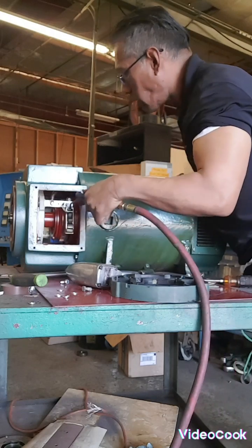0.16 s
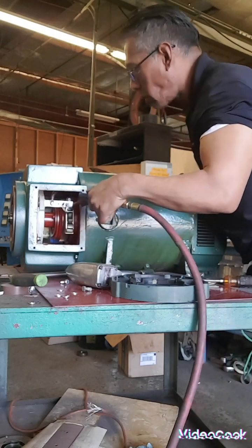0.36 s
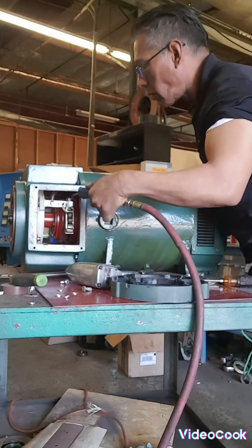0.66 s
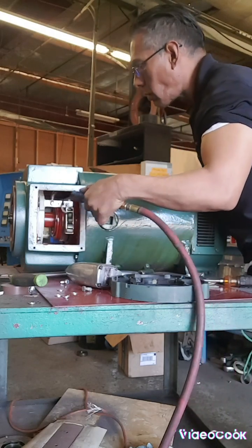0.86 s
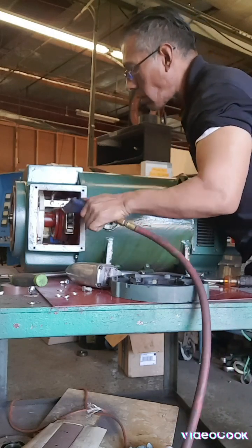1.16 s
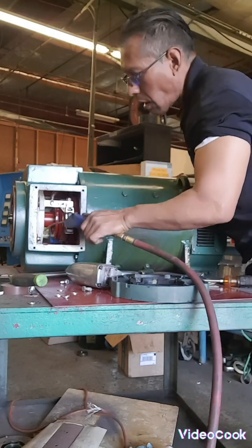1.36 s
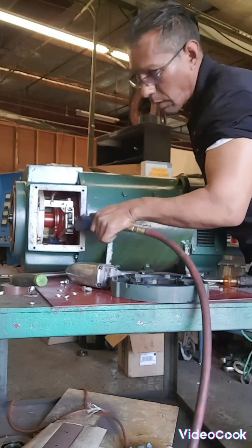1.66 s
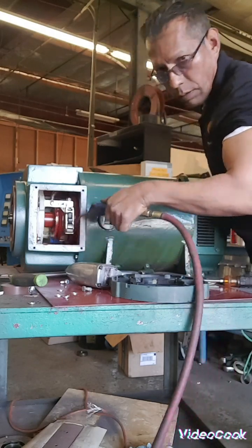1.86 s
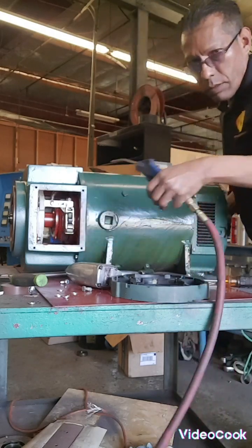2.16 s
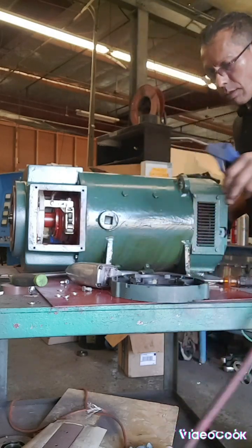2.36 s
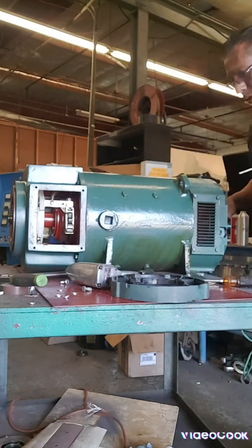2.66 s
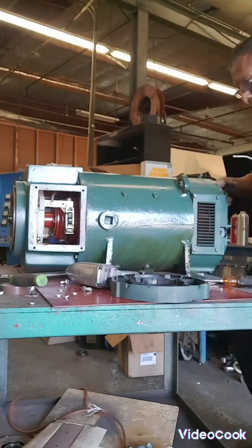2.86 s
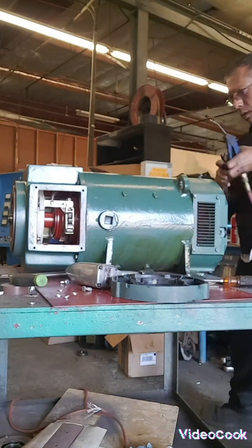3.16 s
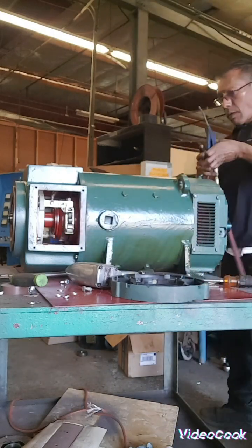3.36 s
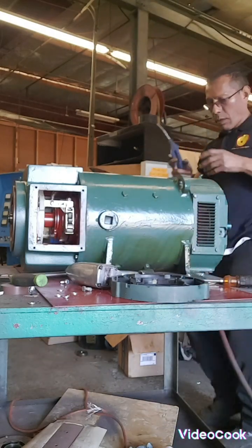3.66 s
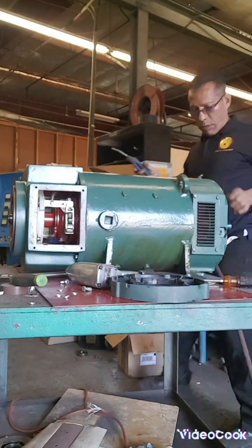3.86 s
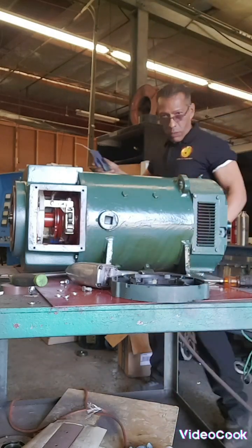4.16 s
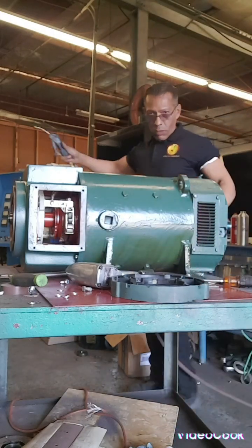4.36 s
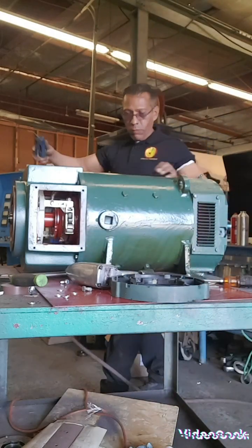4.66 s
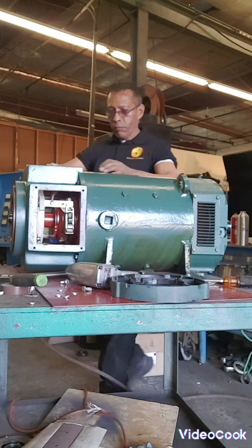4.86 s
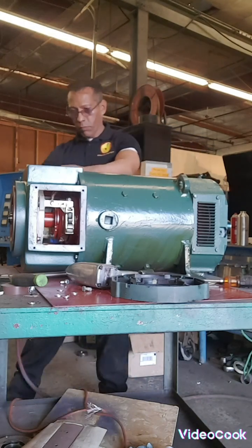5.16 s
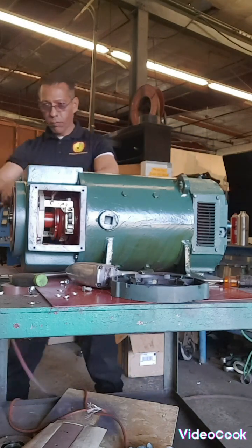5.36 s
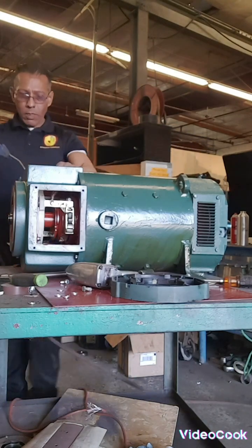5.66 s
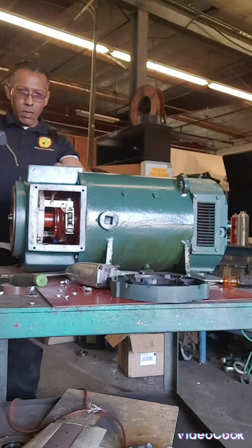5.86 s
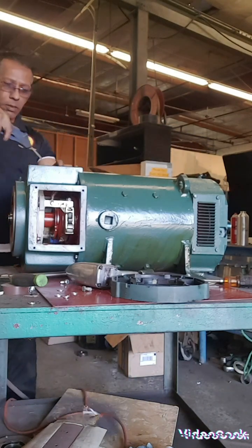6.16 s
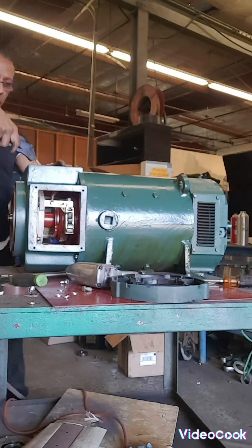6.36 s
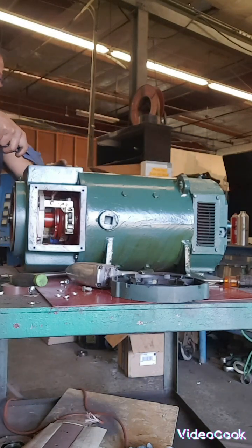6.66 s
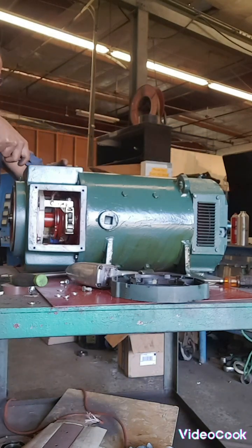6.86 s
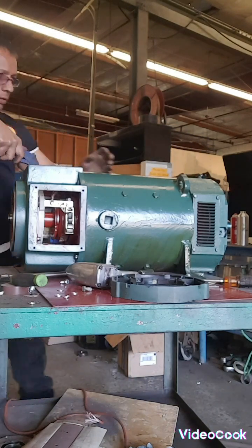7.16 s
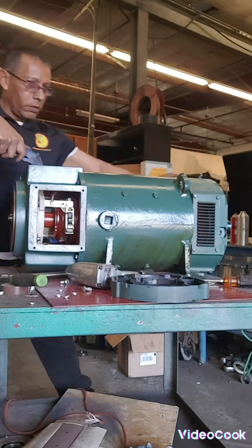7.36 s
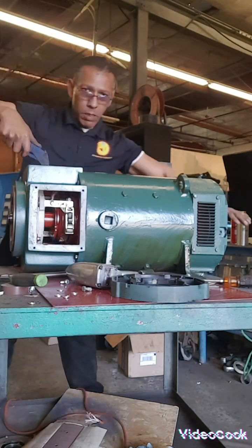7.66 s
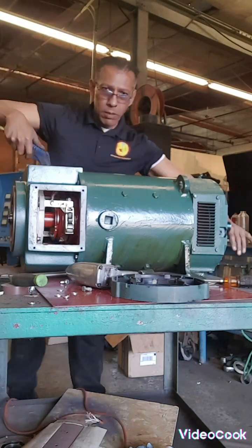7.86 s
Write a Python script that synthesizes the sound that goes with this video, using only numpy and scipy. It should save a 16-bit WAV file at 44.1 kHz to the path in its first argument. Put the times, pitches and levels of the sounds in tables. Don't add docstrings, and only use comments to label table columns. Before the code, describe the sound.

Close compressed-air hiss sweeps and flutters, buffeting the microphone; it stops, shoes scuff, a compressor bursts into chugging, and the jet resumes.

```python
import sys
import numpy as np
from scipy import signal
from scipy.fft import rfft, irfft, next_fast_len
from scipy.io import wavfile
from scipy.ndimage import uniform_filter1d, map_coordinates

SR = 44100
rng = np.random.default_rng(int(sys.argv[2]) if len(sys.argv) > 2 else 0)


def boost(x):
    u = np.asarray(x, float) / 20
    return 10 ** u


def store_wav(level_fs):
    pcm = np.round(np.clip(np.atleast_2d(level_fs), -1, 1) * 32767)
    wavfile.write(sys.argv[1], SR, pcm.T.astype(np.int16))


N = 352800
T = np.arange(N) / SR


def unit(x):
    return x / np.sqrt(np.mean(x ** 2) + 1e-20)


def along(points, hz):
    f, v = np.transpose(points)
    return np.interp(np.log(hz + 1), np.log(f + 1), v)


def levels(*tables):
    each = []
    for table in tables:
        s, *columns = np.transpose(table)
        each.append([np.interp(T, s, c, -120, -120) for c in columns])
    return np.max(each, axis=0)


def wobble(rate):
    knots = rng.standard_normal(int(N * rate / SR) + 4)
    return map_coordinates(knots, [T * rate])


def filtered(x, response):
    m = next_fast_len(N + 8192)
    return irfft(rfft(x, m) * response(np.fft.rfftfreq(m, 1 / SR)), m)[..., :N]


def colour(points, peaks=()):
    def gain(f):
        lift_db = sum(db / (1 + (2 * (f - c) / w) ** 2) for c, w, db in peaks)
        return boost(along(points, f) + lift_db)
    return gain


def rush(gain, alike, patchy_db, lead=0., streak_db=0.):
    z = signal.stft(rng.standard_normal((2, N)), nperseg=512)[2]

    def smooth(bins, frames):
        field = uniform_filter1d(rng.standard_normal(z.shape[1:]), bins, axis=0)
        return unit(uniform_filter1d(field, frames, axis=1))

    def turn(hz):
        return np.arccos(np.clip(along(alike, hz), -1, 1)) / 2

    def shift(hz):
        return np.exp(1j * np.pi * hz * lead / SR * np.array([[1], [-1]]))

    field_db = patchy_db * smooth(6, 10) + streak_db * smooth(2, 16)
    pair = signal.istft(z * boost(field_db), nperseg=512)[1][:, :N]
    mid, side = filtered(pair, lambda hz: gain(hz) * [np.cos(turn(hz)), np.sin(turn(hz))])
    return unit(filtered(np.array([mid + side, mid - side]), shift))


def drone(turns, orders, unsteady_db, blur):
    out = 0
    for k, db in orders:
        swell = boost(db + unsteady_db * wobble(6.5))
        phase = 2 * np.pi * (k * turns + rng.random()) + blur * k * wobble(25)
        out = out + swell * np.sin(phase)
    return out


def shop():
    # time in seconds, hum, murmur and air leak in dB.
    hall_levels = [(2.05, -57, -54, -58), (2.14, -63, -56, -75), (2.71, -62, -51.5, -64.5),
                   (2.79, -59, -52.5, -67.5), (3.01, -62, -54.5, -68), (3.18, -60, -52.5, -66.5),
                   (3.28, -75, -49.5, -66), (3.37, -53, -44.5, -63), (3.43, -55, -48, -61.5),
                   (3.52, -47, -41, -57), (3.69, -40, -39.5, -53.5), (3.75, -43, -39, -53.5),
                   (3.96, -41.5, -36, -52), (4.03, -39, -37.5, -51.5), (4.2, -42, -36, -49.5),
                   (4.22, -32, -30.5, -52), (4.3, -40, -21, -54.5)]
    # multiple of the hum pitch, level in dB.
    hum_orders = [(1, -2.5), (2, -6), (3, -15), (4, -9.5), (5, -13), (6, -18.5), (7, -13.5), (8, -17.5),
                  (9, -19.5), (10, -21), (11, -27.5), (12, -24), (13, -21), (14, -23), (15, -25.5),
                  (16, -16.5)]
    # frequency in Hz, density in dB per Hz.
    murmur_colour = [(18, -49), (30, -16.5), (54, -5), (134, -5), (228, -14), (285, -0.5), (538, -9.5),
                     (688, -5.5), (1880, -28.5), (4000, -24), (5200, -59), (8800, -120)]
    # frequency in Hz, density in dB per Hz.
    leak_colour = [(710, -31), (1200, -4.5), (2330, -6.5), (2740, -7.5), (3780, -19.5), (4120, -12),
                   (5220, -14.5), (8020, -16), (9830, -23.5), (13300, -11), (15600, -10)]
    # frequency in Hz, width in Hz, lift in dB.
    leak_peaks = [(13500, 500, 3), (14700, 400, 3), (15500, 300, 4)]
    hum_hz = 70
    s, *columns = np.transpose(hall_levels)
    duck_db = np.interp(T, [2.0, 2.06, 4.25, 4.45, 6.2, 6.9], [2.5, 10, 3, -7, -15, -24])
    hum_db, murmur_db, leak_db = [np.interp(T, s, c) + duck_db for c in columns]
    hum = boost(hum_db - 1.0) * drone(hum_hz * T, hum_orders, unsteady_db=3.5, blur=.03)
    throb = 1 + 0.21 * np.cos(2 * np.pi * hum_hz * T)
    murmur_noise = rush(colour(murmur_colour), [(100, 0.98), (1000, 0.7), (3000, .1)], patchy_db=2.0)
    murmur = boost(murmur_db - 6.6) * throb * murmur_noise
    leak = boost(leak_db + 4) * rush(colour(leak_colour, leak_peaks), [(3000, .1)], patchy_db=.3)
    return hum + murmur + leak


def scuffs():
    # start in seconds, level in dB, length in seconds, centre in Hz.
    floor_scuffs = [
        (2.356, -48.5, 0.073, 2980),
        (2.71, -56.5, 0.04, 4940),
        (2.951, -52.5, 0.034, 3500),
        (3.345, -43, .015, 500),
        (3.506, -48, 0.066, 7000),
        (3.51, -56, 0.076, 12500),
        (3.538, -40.5, 0.076, 2820),
        (4.108, -52, .05, 4500),
    ]
    out = np.zeros((2, N))
    t = np.arange(SR // 2) / SR
    for s, db, length, hz in floor_scuffs:
        shape = (1 - np.exp(-t / 0.0026)) * boost(-60 * np.maximum(t - length, 0) / 0.38)
        grit = rng.standard_normal((2, len(t))) + 0.64 * rng.standard_normal(len(t))
        b, a = signal.butter(2, [hz * 0.57, min(hz * 1.4, 20000)], "band", fs=SR)
        out[:, round(s * SR):][:, :len(t)] += boost(db) * shape * unit(signal.lfilter(b, a, grit))
    return out


def compressor():
    # time in seconds, tone in dB, throb in dB.
    running_levels = [(4.2, -40, -44), (4.21, -26, -24), (4.25, -20.5, -20.5), (4.32, -27.5, -18),
                      (4.61, -31, -21), (4.92, -30, -21.5), (5.16, -38, -30.5), (5.21, -36.5, -36),
                      (5.58, -41, -26), (5.68, -37.5, -37.5), (5.81, -38, -34), (5.85, -38.5, -34.5),
                      (6.27, -42, -29), (6.55, -70, -35.5), (6.77, -58, -38), (6.82, -62, -47),
                      (6.87, -54, -36), (6.91, -69, -65), (6.97, -78, -54), (7.0, -65, -34)]
    # time in seconds, strokes a second.
    stroke_rate = [
        (4.215, 46),
        (4.245, 51.5),
        (4.26, 52.6),
    ]
    # multiple of the stroke rate, level in dB.
    stroke_orders = [(1, -13), (2, 2), (3, -11), (4, -6), (5, 0), (6, -6.5), (7, -9.5), (8, -5.5), (9, 1),
                     (10, -14), (11, -6), (12, -8.5), (13, -8), (14, -0.5), (15, -11), (16, -18), (17, -8),
                     (18, -11), (19, -20.5), (20, -19)]
    # frequency in Hz, density in dB per Hz.
    throb_colour = [(24, -45), (40, -19), (98, -5.5), (160, -12.5), (472, 0.5), (671, -8.5), (738, 2),
                    (1330, -12), (1800, -22), (2340, -54), (3960, -120)]
    # frequency in Hz, density in dB per Hz.
    valve_colour = [(760, -34), (1300, -15), (1620, -7.5), (2080, -1.5), (2400, -6.5), (3420, -4.5),
                    (4530, -10.5), (5990, -7), (8100, -10), (9570, -18), (15600, -14)]
    # time in seconds, level in dB.
    valve_levels = [(4.215, -46.5), (4.26, -29.5), (4.35, -27.5), (4.6, -28.5), (4.9, -29.5), (5.2, -37),
                    (6.4, -48)]
    # delay in seconds, level in dB.
    pop_echoes = [(.0058, -11), (.0095, -6), (.0142, -5.5), (.023, -9), (.031, -11)]
    start_s = 4.2155
    tone_db, throb_db = levels(running_levels)
    speed = np.interp(T, *np.transpose(stroke_rate)) * (T >= start_s)
    turns = np.cumsum(speed) / SR
    running = np.clip((T - start_s) / .12, 0, 1)

    strokes = np.diff(np.ceil(turns), prepend=0) * boost(1.6 * wobble(50))
    u = (np.arange(200) / SR - .0012) / 0.00046
    pop = (1 - 2 * u * u - 0.89 * u) * np.exp(-u * u)
    first_db = np.interp(T, [4.215, 4.28], [-18, -10])
    pop_db = np.where(T < 4.33, first_db, throb_db + 4)
    direct = boost(pop_db) * signal.fftconvolve(strokes, pop)[:N]
    dull = uniform_filter1d(direct, size=24)
    pops = direct + sum(boost(db) * np.roll(dull, round(s * SR)) for s, db in pop_echoes)

    tones = boost(tone_db + 1.5) * running * drone(turns, stroke_orders, unsteady_db=1.0, blur=0.065)
    beat = 1 + 0.28 * np.cos(2 * np.pi * turns) + 0.1 * np.cos(4 * np.pi * turns)
    throb_noise = rush(colour(throb_colour), [(100, 1.0), (700, 0.62), (1500, 0.081)], patchy_db=3.0)
    throb = boost(throb_db - 4) * running * beat * throb_noise
    valve_beat = 1 + .15 * np.cos(4 * np.pi * turns)
    valve_noise = rush(colour(valve_colour), [(3000, .05)], patchy_db=.6)
    valves = boost(levels(valve_levels)[0]) * valve_beat * valve_noise
    return pops + tones + throb + valves


def gusts():
    # time in seconds, level in dB.
    gust_levels = [
        [(0.0, -52), (0.05, -51), (0.08, -33), (0.1, -32), (0.13, -53), (0.17, -28), (0.3, -53), (0.37, -38.5),
         (0.46, -59), (0.57, -40.5), (0.66, -33), (0.73, -48), (0.82, -33.5), (0.9, -31.5), (0.92, -46),
         (0.96, -28), (1.02, -58), (1.09, -44), (1.12, -59), (1.16, -36), (1.43, -75), (1.45, -57), (1.73, -61),
         (1.84, -47), (1.9, -75), (1.94, -37), (1.99, -37), (2.02, -63), (2.1, -60)],
        [(5.8, -45), (5.92, -37), (5.94, -45), (5.96, -58), (6.32, -49), (6.35, -44), (6.38, -48), (6.45, -54),
         (6.49, -47), (6.57, -58), (6.6, -50), (6.64, -30), (6.68, -39.5), (6.77, -38), (6.83, -58),
         (6.87, -40), (6.89, -45), (6.92, -72), (6.97, -72), (7.06, -39), (7.11, -41), (7.16, -60),
         (7.35, -60.5), (7.38, -63), (7.47, -55), (7.55, -63), (7.7, -53), (7.72, -72), (7.79, -56), (8.0, -54)],
    ]
    # frequency in Hz, density in dB per Hz.
    gust_colour = [(20, -27), (60, -0.5), (120, -4), (400, -15), (1200, -17.5), (3000, -51)]
    lumps = boost(5.5 * np.array([wobble(70), wobble(70)]))
    eddies = lumps * rush(colour(gust_colour), [(60, 0.092)], patchy_db=2.0)
    return boost(levels(*gust_levels)[0] + 5.0) * unit(eddies)


def slaps():
    # start in seconds, peak in dB, 20 dB decay in seconds, top frequency in Hz.
    edge_slaps = [(0.167, -8, 0.01, 900), (0.184, -18, 0.012, 900), (0.542, -6, 0.014, 900),
                  (0.75, -11, 0.012, 900), (0.855, -10, 0.012, 900), (0.952, -16, 0.012, 900),
                  (0.974, -21, 0.01, 900), (1.942, -10.5, 0.0095, 900), (6.534, -13, 0.012, 900),
                  (6.857, -15, 0.012, 900), (7.076, -14, 0.011, 890), (7.141, -28, 0.01, 900)]
    out = np.zeros((2, N))
    t = np.arange(SR // 10) / SR
    for s, db, t60, top_hz in edge_slaps:
        air = rng.standard_normal((2, len(t))) + 0.32 * rng.standard_normal(len(t))
        puff = air * boost(-20 * t / abs(t60))
        b, a = signal.butter(1, [120 / SR * 2, np.clip(top_hz, 300, 9000) / SR * 2], "band")
        puff = signal.lfilter(b, a, puff)
        out[:, round(s * SR):][:, :len(t)] += boost(db - 3.0) * puff / np.max(abs(puff))
    return out


def jet():
    # time in seconds, nozzle hiss, splash, edge roar and hollow housing in dB.
    bursts = [
        [(0.0, -26, -30.5, -40, -34.5), (0.14, -28, -28.5, -39.5, -48), (0.174, -27, -28.5, -22.5, -21.5),
         (0.206, -28, -28, -39.5, -35), (0.272, -27, -23.5, -38, -48), (0.342, -23.5, -24.5, -41.5, -43),
         (0.51, -26, -27, -34, -53), (0.538, -24.5, -27.5, -31.5, -31), (0.658, -23, -25.5, -27.5, -31.5),
         (0.724, -25, -26, -35.5, -55), (0.762, -24.5, -27, -22.5, -21.5), (0.81, -22, -28, -32, -37),
         (0.876, -26, -26.5, -19, -30.5), (0.908, -22, -25, -39, -48), (0.996, -25, -22.5, -20, -43),
         (1.05, -24, -36, -38, -36)],
        [(1.05, -27, -32, -34.5, -42), (1.128, -25, -32, -32.5, -37), (1.148, -24, -29, -34, -48),
         (1.174, -24, -34, -36, -31), (1.226, -28, -33.5, -40, -41), (1.308, -24, -30, -38, -41),
         (1.328, -25.5, -31.5, -37.5, -52), (1.492, -29, -36.5, -38.5, -45), (1.582, -24.5, -29.5, -31, -49),
         (1.66, -26.5, -32.5, -34.5, -45), (1.712, -28, -33.5, -40, -40.5), (1.828, -26, -36.5, -36, -39.5),
         (1.842, -26, -34, -33, -46), (1.9, -28, -34, -32, -42)],
        [(1.9, -24, -33, -35, -39), (1.924, -26, -26, -37, -39), (1.956, -16, -19, -27, -35),
         (1.988, -21, -20, -29, -40), (2.0, -25, -17.5, -26.5, -47), (2.014, -33, -27, -35, -45),
         (2.058, -51, -32.5, -43.5, -51), (2.17, -69, -43, -48, -60), (2.244, -84, -49.5, -49, -59),
         (2.42, -70, -63, -52, -65), (2.5, -85, -69, -68, -62)],
        [(4.84, -43, -39, -29.5, -36), (4.894, -42, -45, -30.5, -30), (4.914, -31, -38, -38, -26),
         (4.94, -27, -34, -29, -25), (4.976, -22, -30.5, -31.5, -24), (5.082, -22.5, -31, -27, -28.5),
         (5.192, -22.5, -22.5, -20.5, -33.5), (5.252, -22, -29.5, -28.5, -32), (5.29, -20, -23.5, -22, -38),
         (5.318, -22, -24, -29.5, -32), (5.4, -25, -30.5, -30.5, -34.5), (5.6, -28, -32, -30.5, -28.5)],
        [(5.6, -26, -27, -28, -31), (5.676, -23, -30.5, -33.5, -33), (5.788, -21, -31, -31, -31),
         (5.952, -19, -29, -33.5, -39.5), (6.076, -26, -26.5, -25.5, -31), (6.15, -25, -30.5, -31.5, -44),
         (6.172, -26.5, -20.5, -27.5, -30), (6.202, -24, -27.5, -30, -29), (6.294, -25, -28, -26, -31),
         (6.312, -22, -27.5, -33.5, -30), (6.374, -26, -33.5, -24, -27), (6.46, -24, -22, -28, -35),
         (6.51, -22, -28, -28, -26.5), (6.552, -24, -21.5, -22, -35), (6.6, -28, -27.5, -31.5, -38),
         (6.646, -18, -19.5, -30, -31), (6.7, -26, -24.5, -26, -37)],
        [(6.7, -19, -22.5, -28, -39), (6.768, -26.5, -23.5, -33.5, -31), (6.814, -24, -16, -31.5, -53),
         (6.852, -25, -23.5, -32.5, -38), (6.916, -29.5, -35, -44, -64), (6.988, -26, -28.5, -32, -55),
         (7.006, -28.5, -33.5, -42, -43), (7.082, -31, -26, -25, -28), (7.116, -26, -30.5, -47, -52),
         (7.14, -28, -26, -30.5, -53), (7.196, -29, -25, -27.5, -38.5), (7.286, -22.5, -26.5, -40, -41),
         (7.318, -22, -27.5, -30.5, -36.5), (7.398, -25.5, -27.5, -34, -48), (7.452, -27.5, -29, -24, -40),
         (7.622, -24.5, -29.5, -38.5, -45.5), (7.84, -28, -24.5, -24.5, -33.5), (7.952, -26, -28.5, -31, -36.5),
         (8.0, -24, -26.5, -32.5, -38)],
    ]
    # frequency in Hz, density in dB per Hz.
    jet_colour = [(88, -38.5), (150, -7), (249, -5.5), (326, -4), (767, -9), (969, -6), (1110, -5),
                  (2370, -4.5), (2770, -5.5), (4860, -0.5), (8060, -3.5), (9600, -12), (13100, 0.5),
                  (15600, -5)]
    # frequency in Hz, width in Hz, lift in dB.
    housing = [(339, 40, 6.5), (958, 81, 5), (1737, 180, 4), (2403, 66, 4), (4730, 810, 2.5),
               (6030, 130, 6), (7810, 450, 3.5), (15000, 1000, 7)]
    # frequency in Hz, left-right likeness from 0 to 1.
    jet_alike = [(200, 0.97), (1000, 0.49), (3000, 0.29), (9000, 0.43), (15000, 0.38)]
    whole = colour(jet_colour, housing)

    def part(lo_hz, hi_hz, patchy_db, streak_db):
        def gain(f):
            return whole(f) / np.sqrt((1 + (lo_hz / (f + 1)) ** 8) * (1 + (f / hi_hz) ** 8))
        return rush(gain, jet_alike, patchy_db, lead=2.1, streak_db=streak_db)

    hiss_db, splash_db, edge_db, hollow_db = levels(*bursts)
    flutter = wobble(30)
    hiss_gain = boost(hiss_db + 4.0 + 0.8 * flutter)
    splash_gain = boost(splash_db + 1.5 + .8 * flutter)
    edge_gain = boost(edge_db + 0.5 + 1.16 * flutter + 0.63 * wobble(60))
    hollow_gain = boost(hollow_db - 0.56 + 1.0 * flutter + 0.96 * wobble(45))
    hiss = hiss_gain * part(8350, 30000, patchy_db=2.2, streak_db=1.5)
    splash = splash_gain * part(2420, 10300, patchy_db=2.44, streak_db=2.0)
    edge = edge_gain * part(620, 2830, patchy_db=1.7, streak_db=2.5)
    hollow = hollow_gain * part(220, 724, patchy_db=1.5, streak_db=2.1)
    return hiss + splash + edge + hollow


def scene():
    hall = (shop() + scuffs()) * boost([[-.6], [.6]])
    return hall + compressor() + gusts() + slaps() + jet()


def roll_off(x):
    return signal.sosfilt(signal.butter(12, 17090, fs=SR, output="sos"), x)


def record(dry):
    top_hz = 15840
    ports = dry * boost([[-.9], [.9]])
    return roll_off(filtered(ports, lambda hz: hz < top_hz))


dry = scene()
out = record(dry)
store_wav(out)
```